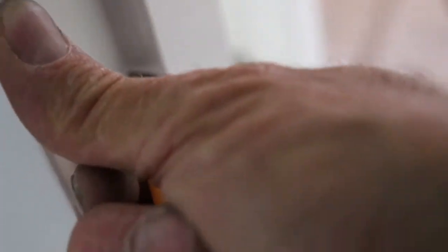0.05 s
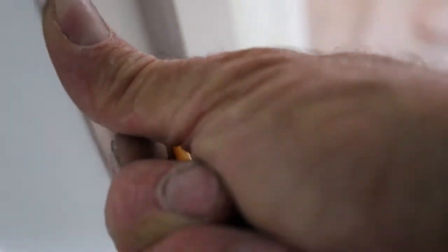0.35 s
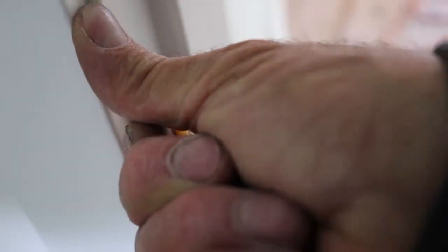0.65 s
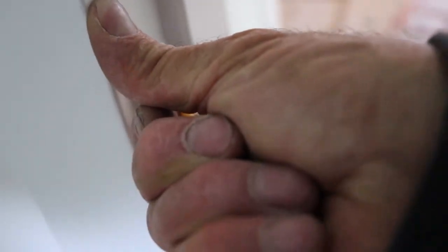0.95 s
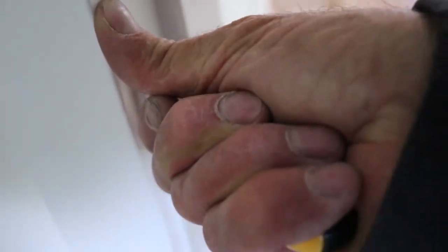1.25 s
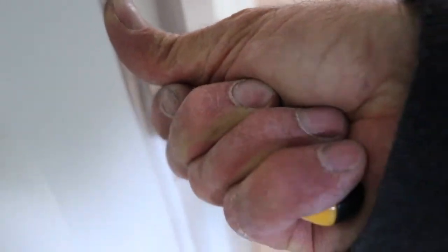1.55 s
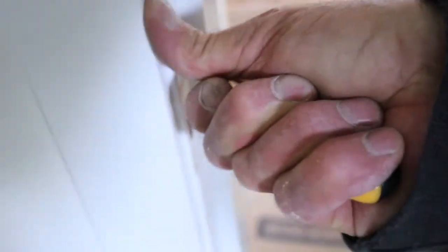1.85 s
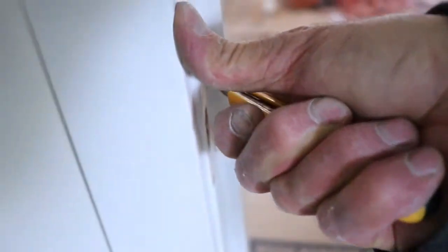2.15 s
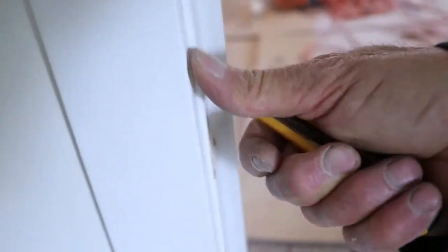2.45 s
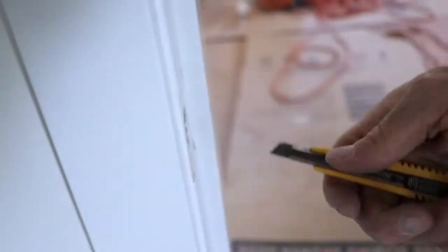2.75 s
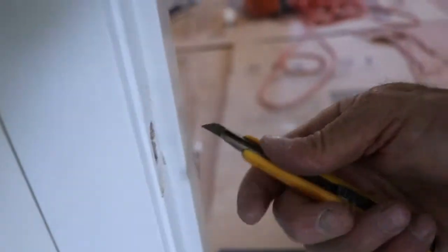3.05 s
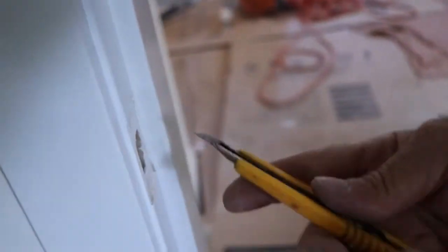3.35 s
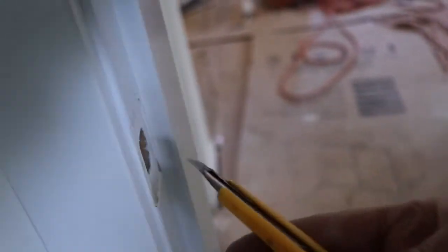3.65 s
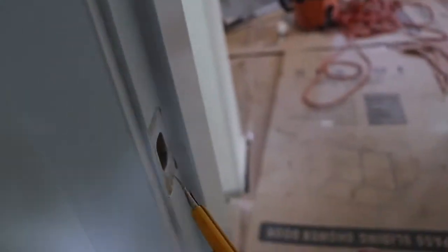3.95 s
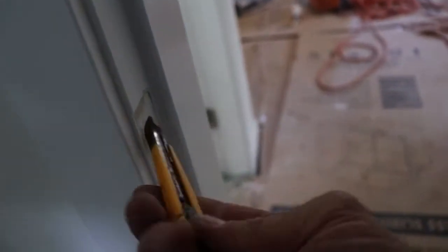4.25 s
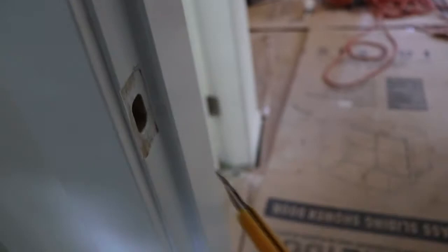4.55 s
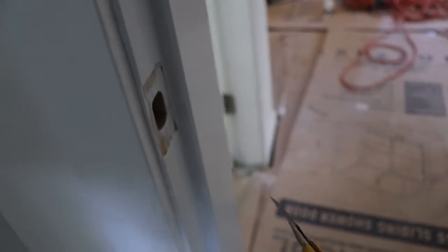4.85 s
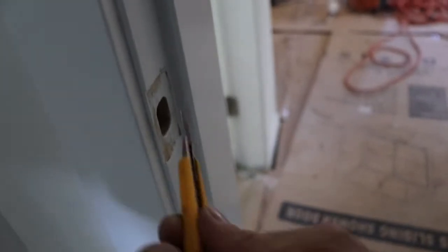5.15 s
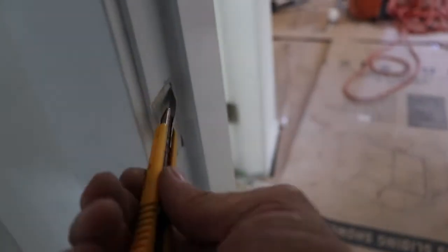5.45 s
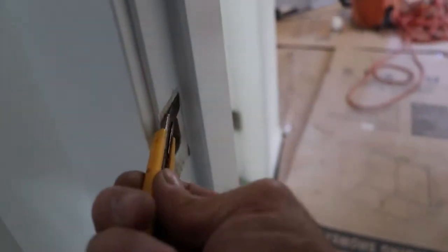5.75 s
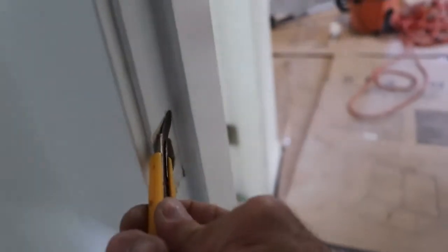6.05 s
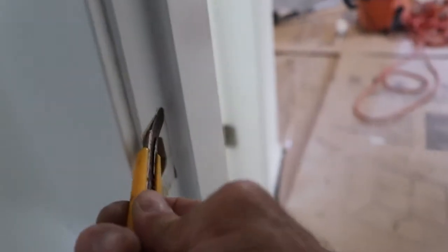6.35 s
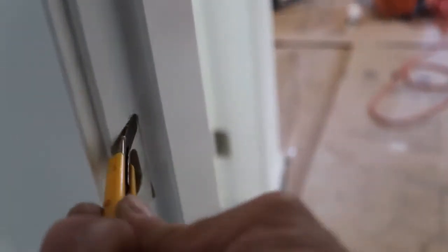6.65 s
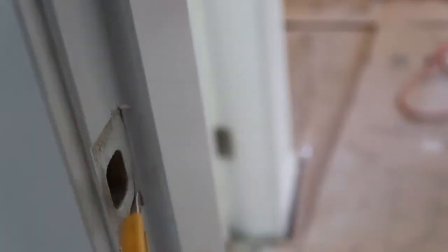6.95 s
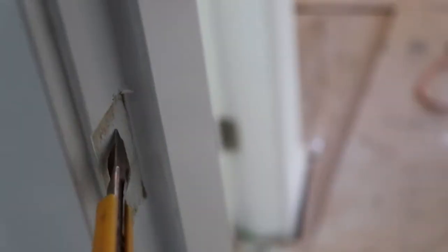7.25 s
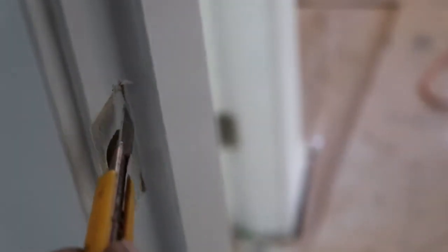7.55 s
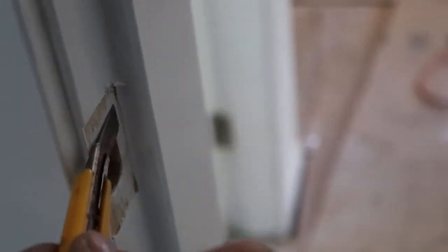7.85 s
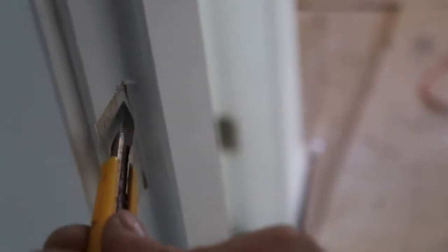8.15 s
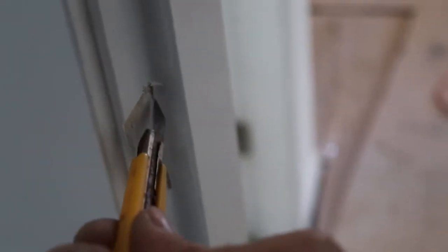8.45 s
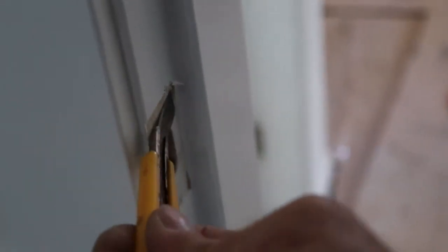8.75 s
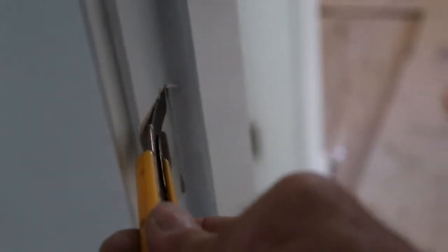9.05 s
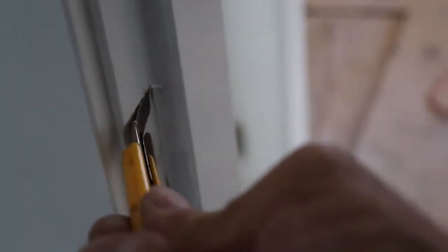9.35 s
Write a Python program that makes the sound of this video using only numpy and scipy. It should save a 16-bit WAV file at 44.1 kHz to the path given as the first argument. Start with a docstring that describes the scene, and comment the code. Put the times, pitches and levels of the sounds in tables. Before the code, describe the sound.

Sharp clicks and snaps come unevenly as a knife blade digs into a painted wooden door frame, close to the microphone. The cracks bunch into a loud flurry early on, then continue as lighter picking and scraping broken by a few hard snaps, dull knocks and one short ring of steel. Soft rubbing of skin and cloth and low microphone handling bumps run underneath, with the short echo and faint hiss of a bare room.

```python
"""A bare room, close to a door frame: a snap-off utility knife chips paint and wood out of a latch recess.
The blade sticks and slips in short cracks, squeaks once and twangs as it springs free. The frame thuds,
hand and sleeve rub along, and a camera body rumbles in the other hand. The room answers over its own
faint hiss. The camera's gain control ducks after the hardest cracks, which clip."""
import sys
import numpy as np
from scipy import signal
from scipy.fft import rfft, irfft, next_fast_len
from scipy.io import wavfile
from scipy.ndimage import uniform_filter1d, map_coordinates

SR = 44100
rng = np.random.default_rng(int(sys.argv[2]) if len(sys.argv) > 2 else 0)


def pcm_store(signal):
    """Save signal as 16-bit PCM."""
    levels = np.round(np.clip(np.atleast_2d(signal), -1, 1) * 32767)
    wavfile.write(sys.argv[1], SR, levels.astype(np.int16).T)


N = 418509


def amp(db):
    """Decibels to gain."""
    return 10 ** (np.asarray(db) / 20)


def unit(x):
    """Scale to rms 1."""
    return x / np.sqrt(np.mean(x ** 2) + 1e-20)


def along(points, hz):
    """Interpolate (freq_hz, value) points on a log axis."""
    freq_hz, values = np.transpose(points)
    return np.interp(np.log(hz + 1), np.log(freq_hz + 1), values)


def wobble(rate_hz):
    """Smooth random curve with knots at rate_hz."""
    knots = rng.standard_normal(int(N * rate_hz / SR) + 4)
    return map_coordinates(knots, [np.arange(N) * rate_hz / SR])


def noise(spectrum, size):
    """Noise of rms 1 with a given spectrum."""
    n_fft = next_fast_len(size)
    hz = np.fft.rfftfreq(n_fft, 1 / SR)
    phases = np.exp(2j * np.pi * rng.random(len(hz)))
    return unit(irfft(amp(along(spectrum, hz)) * phases, n_fft)[:size])


def burst(spectrum, envelope):
    """Shaped noise under an envelope, scaled to the envelope's energy."""
    x = noise(spectrum, len(envelope)) * envelope
    return x * np.linalg.norm(envelope) / (np.linalg.norm(x) + 1e-12)


def swell(length_s, attack_s, release_s, sag_db_per_s=0):
    """Envelope of a movement: sets in, holds or sags, dies away."""
    t = np.arange(SR) / SR
    release = np.exp(-np.maximum(t - length_s, 0) / release_s)
    return (1 - np.exp(-t / attack_s)) * amp(-sag_db_per_s * t) * release


def add(track, start_s, sound):
    """Mix a sound into a track."""
    start = max(round(start_s * SR), 0)
    part = track[start:start + len(sound)]
    part += sound[:len(part)]


def lag(x, time_s):
    """One-pole smoothing."""
    pole = np.exp(-1 / (time_s * SR))
    return signal.lfilter([1 - pole], [1, -pole], x)


def peak(hz, centre_hz, half_width_hz):
    """Resonance curve of height 1."""
    return 1 / (1 + ((hz - centre_hz) / half_width_hz) ** 2)


def causal(gain):
    """Minimum-phase response: rings only after it is struck."""
    cepstrum = irfft(np.log(np.maximum(gain, 1e-6)))
    half = len(cepstrum) // 2
    return np.exp(rfft(cepstrum * np.r_[1, np.full(half - 1, 2), 1, np.zeros(half - 1)]))


# Background air: freq_hz, density_db
AIR_SPECTRUM = [(18, -27), (30, 1), (103, -4), (214, -4), (402, -8.5), (735, -11.5), (981, -14.5),
                (1610, -17), (2100, -17.5), (2270, -19), (3030, -21), (4860, -24), (7390, -25.5),
                (14600, -28.5), (15800, -33)]


def room_tone(level_db=-45):
    """Steady low room tone and hiss."""
    return amp(level_db) * noise(AIR_SPECTRUM, N)


# Reverberation time: freq_hz, t60_s
ROOM_DECAY = [(100, 0.14), (400, 0.67), (2000, 0.5), (6000, 0.54), (10000, 0.39), (16000, 0.48)]
# Colour of the reverberation: freq_hz, gain_db
WALL_COLOUR = [(100, 7), (900, 5.5), (1600, 0), (3000, -4.5), (5500, -0.5), (15000, 1.5)]


def room_response(near_db=-22, near_decay_s=0.019, tail_db=-15, build_s=0.00043):
    """The near door leaf answers at once; the bare room builds up and dies away."""
    hz, frame_s, bands = signal.stft(rng.standard_normal(SR * 3 // 4), SR, nperseg=256)
    band_db = along(WALL_COLOUR, hz)[:, None] - 60 * frame_s / along(ROOM_DECAY, hz)[:, None]
    tail = signal.istft(bands * amp(band_db), SR, nperseg=256)[1]
    t = np.arange(len(tail)) / SR
    tail *= 1 - np.exp(-t / build_s)
    near = rng.standard_normal(len(t)) * np.exp(-t / near_decay_s) * (t > 0.002)
    return amp(tail_db) * tail / np.linalg.norm(tail) + amp(near_db) * near / np.linalg.norm(near)


# Knife's send to the room, low while the fist is cupped over it: time_s, gain_db
KNIFE_SEND = [(0, -3), (.7, -9), (1.3, 2.5), (1.9, 0.5), (2.6, -4), (3.2, 2.5), (5.7, -0.5), (6.9, -1),
              (7.6, -0.5), (9.49, 2)]


def room_echoes(knife, thuds, thud_send_db=8, segments=16):
    """Echoes change as knife and camera move; the broad frame radiates more than the small blade."""
    knife_send_db = np.interp(np.arange(N) / SR, *np.transpose(KNIFE_SEND))
    send = amp(knife_send_db) * knife + amp(thud_send_db) * thuds
    track, step = np.zeros(N), N // segments + 1
    for start in range(0, N, step):
        add(track, start / SR, signal.fftconvolve(send[start:start + step], room_response()))
    return track


# Camera body rumble: freq_hz, density_db
CAMERA_SPECTRUM = [(20, -18), (45, 1), (68, -8.5), (100, 5.5), (125, -0.5), (170, -5), (250, -12.5),
                   (400, -23.5), (900, -34.5), (2500, -60)]
# Grip shifts: start_s, length_s, level_db
GRIP_SHIFTS = [(0, .2, -27.5), (0.236, 0.22, -31.5), (.51, .2, -37.5), (1.218, 0.34, -42.5),
               (1.74, 0.25, -43), (2.28, .25, -43), (3.173, 0.38, -43.5), (3.65, 0.12, -38),
               (3.74, .2, -31), (4.57, 0.055, -30), (4.717, 0.13, -46), (5.268, 0.081, -46),
               (5.71, .11, -40.5), (6.025, 0.11, -36.5), (6.29, 0.4, -36), (6.65, .42, -38.5),
               (7.103, 0.28, -34), (7.758, 0.042, -33)]
# Hand bumps on the camera: start_s, level_db, pitch_hz, decay_s
CAMERA_BUMPS = [(0, -16.5, 88, 0.05), (.06, -18, 102.2, 0.076), (0.414, -20, 100, 0.016),
                (1.645, -25.5, 50.5, 0.023), (3.256, -18, 62.4, 0.049), (3.94, -20, 93.3, 0.049),
                (4.557, -25, 95, 0.042), (4.823, -23.5, 114, 0.016), (5.252, -13.5, 123, 0.0092),
                (6.058, -22, 48, 0.04), (6.06, -12, 91.5, 0.015), (6.274, -15, 91, 0.015),
                (6.325, -16.5, 106, 0.016), (7.446, -19.5, 112, 0.03), (7.745, -19.5, 117, 0.043),
                (7.807, -17, 108, 0.024), (9.042, -31, 74.6, 0.016)]


def camera_handling(rest_db=-54, grip_trim_db=-2, lumpy_db=2, bump_trim_db=-1, bump_attack_s=0.005):
    """The shifting grip rumbles through the camera body; each bump rings its low mode."""
    power = np.full(N, amp(rest_db) ** 2)
    for start_s, length_s, level_db in GRIP_SHIFTS:
        shift = amp(level_db) * swell(length_s, attack_s=0.012, release_s=0.057)
        add(power, start_s, shift ** 2)
    track = np.sqrt(power) * amp(grip_trim_db + lumpy_db * wobble(20)) * noise(CAMERA_SPECTRUM, N)
    t = np.arange(SR // 3) / SR
    for start_s, level_db, pitch_hz, decay_s in CAMERA_BUMPS:
        envelope = np.exp(-t / decay_s) * (1 - np.exp(-t / bump_attack_s))
        add(track, start_s, amp(level_db + bump_trim_db) * envelope * np.sin(2 * np.pi * pitch_hz * t))
    return track


# Skin and cloth sliding: freq_hz, density_db
SLIDE_SPECTRUM = [(200, -5), (500, 5), (1200, -3), (2200, -1), (3200, -2), (5000, 3.5), (6600, -4),
                  (8500, -10.5), (12000, -26.5), (16000, -28)]
# Fizz of catching surfaces and splinters: freq_hz, density_db
FIZZ_SPECTRUM = [(4000, -37), (7000, 6), (8500, 1.5), (11500, -0.5), (15000, -16), (17000, -0.5)]
# Edge dragged along the grain: freq_hz, density_db
RASP_SPECTRUM = [(700, -30), (1400, -14), (1950, 0), (2600, -4), (3100, -8), (4100, 2), (4800, -3.5),
                 (6200, -9), (12000, -32)]
# Strokes of hand, sleeve and blade: start_s, length_s, level_db, fizz_rel_db, rasp_rel_db
STROKES = [(0, 0.5, -56, -14, -10), (1.348, 0.033, -42.5, -13, -14), (1.669, .07, -48.5, -4, -12),
           (2.373, 0.18, -38, -19, -15), (2.685, 0.18, -37, -14, -7), (2.887, 0.22, -40, -18, -18),
           (3.193, 0.067, -33.5, -14, -10), (3.301, .15, -39.5, -8, -7), (3.513, 0.14, -40.5, -9, 2),
           (3.726, 0.14, -39.5, -9, -14), (3.915, 0.14, -41, -25, -12), (4.227, 0.079, -42, -7, 6.5),
           (4.37, 0.3, -48, -12, -4), (4.65, 0.18, -47, -10, 5), (4.923, 0.13, -46, -9, 2.5),
           (5.12, .43, -51.5, -18, -10), (5.615, 0.024, -48, -16, 6), (5.946, 0.032, -44.5, -16, 1),
           (6.567, 0.27, -52.5, -16, 9.5), (6.95, 0.14, -54, -10, 5), (7.317, 0.02, -46, -21, -3),
           (7.806, 0.015, -43, -22, 4.5)]


def rubbing(rest_db=-56.5, grain_db=1.5, grit_db=4):
    """Skin, cloth and steel slide and fizz where they catch; the edge rasps. Each stroke slows."""
    catching = amp(wobble(40))
    slide = unit(noise(SLIDE_SPECTRUM, N) * amp(grain_db * wobble(500)) * catching)
    fizz = unit(noise(FIZZ_SPECTRUM, N) * amp(grain_db * wobble(1200)) * catching ** 2)
    rasp = unit(noise(RASP_SPECTRUM, N) * amp(grit_db * wobble(350)) * catching)
    slide_power, fizz_power, rasp_power = np.full(N, amp(rest_db) ** 2), np.zeros(N), np.zeros(N)
    for start_s, length_s, level_db, fizz_rel_db, rasp_rel_db in STROKES:
        stroke = amp(level_db) * swell(length_s, attack_s=0.0073, release_s=0.048, sag_db_per_s=11.5)
        add(slide_power, start_s, stroke ** 2)
        add(fizz_power, start_s, (amp(fizz_rel_db) * stroke) ** 2)
        add(rasp_power, start_s, (amp(rasp_rel_db) * stroke) ** 2)
    return np.sqrt(slide_power) * slide + np.sqrt(fizz_power) * fizz + np.sqrt(rasp_power) * rasp


# Ticks, flakes and blade cracks: freq_hz, density_db
CRACK_SPECTRUM = [(700, -67), (1200, -11), (2100, 0), (3500, -0.5), (6000, 1), (7300, -6.5), (8500, -10.5),
                  (12000, -33)]


def ticks_and_flakes(tick_count=70, tick_db=-45, flakes_per_stroke=5, flake_rel_db=1, spread_db=3.5):
    """The handle ticks in the fist; paint flakes break off under every stroke."""
    track, t = np.zeros(N), np.arange(SR // 50) / SR
    envelope = np.exp(-t / 0.0007)
    clicks = [(at * N / SR, tick_db) for at in rng.random(tick_count)]
    for start_s, length_s, level_db, _, _ in STROKES:
        for at in rng.random(flakes_per_stroke):
            clicks.append((start_s + at * length_s, level_db + flake_rel_db))
    for start_s, level_db in clicks:
        boost_db = spread_db * min(rng.exponential(), 3)
        add(track, start_s, amp(level_db + boost_db) * burst(CRACK_SPECTRUM, envelope))
    return track


def tip_squeak(start_s=3.945, length_s=0.135, top_hz=8170, arch_hz=950, waver_hz=35,
               level_db=-56, flicker_db=4):
    """The tip skids over paint; pitch and level rise and fall with its speed."""
    progress = np.clip((np.arange(N) / SR - start_s) / length_s, 0, 1)
    speed = 4 * progress * (1 - progress)
    pitch_hz = top_hz - arch_hz * (1 - speed) + waver_hz * wobble(300)
    envelope = speed * amp(level_db + flicker_db * wobble(70))
    return envelope * np.sin(2 * np.pi * np.cumsum(pitch_hz) / SR)


# Door frame response: freq_hz, density_db
FRAME_SPECTRUM = [(30, -25), (90, -2), (160, -2.5), (230, 5), (300, -1), (390, -13), (470, -5.5),
                  (680, -10), (950, -14), (1300, -16), (4000, -51)]
# Blows on the frame: start_s, level_db, decay_s
FRAME_THUDS = [(1.239, -33.5, 0.0093), (1.466, -31.5, 0.015), (1.757, -31, 0.016), (1.915, -23.5, 0.065),
               (2.258, -31.5, 0.016), (2.362, -30.5, 0.011), (3.165, -17, 0.024), (3.252, -32, 0.036),
               (4.559, -41, 0.017), (5.688, -31, 0.019), (5.993, -21.5, 0.0074), (6.138, -26, 0.0051),
               (6.25, -23.5, 0.0035), (9.041, -14, 0.0064)]


def frame_thuds(attack_s=0.0014):
    """The door frame takes the heavier pushes as dull thuds."""
    track, t = np.zeros(N), np.arange(SR // 3) / SR
    for start_s, level_db, decay_s in FRAME_THUDS:
        envelope = np.exp(-t / decay_s) * (1 - np.exp(-t / attack_s))
        add(track, start_s, amp(level_db) * burst(FRAME_SPECTRUM, envelope))
    return track


# Modes of the free blade: pitch_hz, gain_db, t60_s
BLADE_MODES = [(3520, -4, .14), (3875, -4, 0.11), (5400, -3, 0.18), (9400, -8, 0.073), (11680, -6, .09),
               (14100, -15, .08)]
# Blade springing free: start_s, level_db
BLADE_TWANGS = [(7.568, -24), (8.445, -43)]


def blade_twangs():
    """Out of the cut, the undamped steel rings on briefly."""
    track, t = np.zeros(N), np.arange(SR // 3) / SR
    ring = sum(amp(gain_db - 60 * t / t60_s) * np.sin(2 * np.pi * pitch_hz * t)
               for pitch_hz, gain_db, t60_s in BLADE_MODES)
    for start_s, level_db in BLADE_TWANGS:
        add(track, start_s, amp(level_db) * ring)
    return track


# Hollow handle and its steel guide: centre_hz, half_width_hz, gain_db
HANDLE_MODES = [(1607, 170, -3), (2248, 233, -5), (2970, 130, -4), (3383, 400, -2), (3955, 196, -6),
                (4470, 305, -4), (5490, 760, -1.5), (6720, 360, -4.5)]


def handle_response(hz, spread_db=3.5, floor=0.33):
    """The handle's gain curve; the fingers damp its modes differently every time."""
    return floor + sum(amp(gain_db + spread_db * rng.standard_normal()) * peak(hz, centre_hz, width_hz)
                       for centre_hz, width_hz, gain_db in HANDLE_MODES)


def fibre_tear(t, rise_s, decay_s, grit_db=1, snap=0.37, snap_s=0.0006, after_db=-24, after_s=0.013):
    """Force spectrum of one crack: fibres tear ever faster, snap at t = 0, and a few more give way."""
    main_tear = np.exp(np.where(t < 0, t / rise_s, -t / decay_s))
    last_fibres = amp(after_db) * np.exp(-np.abs(t) / after_s) * (t > 0)
    envelope = np.hypot(main_tear, last_fibres)
    slips = amp(grit_db * unit(uniform_filter1d(rng.standard_normal(len(t)), size=40)))
    letting_go = 1 + snap * np.exp(-np.abs(t) / snap_s)
    spectrum = rfft(envelope * slips * letting_go * rng.standard_normal(len(t)))
    band_power = np.abs(uniform_filter1d(np.abs(spectrum) ** 2, size=70) + 1e-12)
    whitened = spectrum * causal(band_power ** -0.5)
    return np.linalg.norm(envelope) * whitened


# Knock of the wood: freq_hz, density_db
WOOD_SPECTRUM = [(60, -6.5), (200, -3.5), (320, -0.5), (430, -3.5), (620, -10), (930, 4), (1130, 0.5),
                 (1330, 3.5), (1560, -7.5), (1850, 3), (2300, -25), (5000, -60)]
# Blade cracks in the wood: snap_s, level_db, rise_s, decay_s, ring_hz, lift_db, wood_db, fizz_db
BLADE_CRACKS = [(0.148, -18.5, .0004, 0.0015, 1500, 3, -16, -17),
                (0.313, -28.5, .0003, 0.00048, 5000, 6, -15, -8),
                (0.3417, -18, .0004, 0.0013, 4300, -6, -25, -18),
                (0.3461, -5.5, 0.00028, 0.00079, 1520, 0, -34, -12),
                (0.3601, -10.5, .006, 0.0053, 4080, -4, -18.5, -14),
                (0.5075, -19.5, 0.0012, 0.0013, 1520, 7, -16, -24),
                (0.5497, -28, .0008, 0.0021, 2220, 16, -18, -27),
                (0.6938, -23.5, .0019, 0.0065, 1590, 3, -9, -12),
                (0.7853, -23, 0.00043, 0.0011, 2150, 20, -27, -18),
                (0.933, -42, 0.0058, .008, 1910, 9, 1, -14),
                (1.1999, -18, .0009, 0.001, 1620, 21, -4.5, -29),
                (1.2389, -11, 0.001, 0.00086, 1670, 10.5, -6, -20),
                (1.2926, -28, 0.001, .0009, 1690, 3, -10, -13),
                (1.372, -25.5, 0.0005, 0.0028, 1620, -3, -18, -7.5),
                (1.466, -29, 0.0022, 0.0054, 6150, 9, -1, -11),
                (1.765, -31.5, 0.021, 0.0046, 1680, 7, -9, -5),
                (1.925, -16, 0.0049, 0.0065, 1520, 13, -6, -12),
                (1.9324, -3, 0.0007, 0.00068, 3060, 5, -20, -6.5),
                (1.9419, -12.5, 0.0033, .007, 1610, 7, -4, -19),
                (2.1147, -14.5, 0.00035, 0.0021, 3280, 9, -15, -23),
                (2.2629, -7, .0013, 0.00094, 2200, 14, -10.5, -16.5),
                (2.3619, -17, 0.00018, 0.0013, 6040, -2, -9.5, -0.5),
                (2.4098, -12.5, 0.00019, 0.0014, 1570, 9, -12, -17),
                (2.44, 5.5, 0.00047, 0.00095, 2400, 10.5, -11.5, -17.5),
                (2.459, -17, .0008, .0015, 1730, 24, -10, -15),
                (2.4801, -15.5, .0017, 0.0032, 1480, 3, -10, -18),
                (2.5295, -19, .0005, .0007, 2200, 8, -7, -16),
                (2.549, -3.5, 0.0011, 0.00038, 2340, 16, -16, -22),
                (2.5679, -10.5, 0.0023, .0009, 2300, 10, -7, -11),
                (2.5765, 15.5, .0007, 0.0023, 2300, 0.5, -22, -11),
                (2.5961, 0.5, .004, 0.0044, 2300, -2, -35, -6.5),
                (2.6158, -6, 0.0013, 0.0021, 4370, 9, -39, -19),
                (2.7438, -17.5, .0008, .0009, 1600, 12, -13, -20),
                (2.9605, -24.5, 0.0059, 0.0027, 1800, -6, -11, -19),
                (2.98, -27, 0.0066, 0.0055, 1670, -2, -24, -15),
                (3.027, -31, .0003, .006, 3050, -4, -16, -12),
                (3.117, -6, 0.00024, 0.0018, 4260, 7.5, -42, -11),
                (3.155, -19.5, 0.0014, 0.0056, 4030, -8, -12, -17),
                (3.1778, -6.5, .0003, 0.0028, 4440, 3, -30, -16),
                (3.1934, -10, 0.00029, 0.005, 6400, -1, -27, -9),
                (3.234, -26, .0009, 0.0073, 1530, 14, -17, -19),
                (3.257, -21, 0.0097, 0.004, 1590, 6, -17, -18),
                (3.3815, -6, 0.00043, .001, 4840, 4.5, -33, -15),
                (3.582, -24.5, 0.00067, 0.025, 2130, -12, -12, -17),
                (3.7668, -19.5, 0.00035, 0.0034, 3500, -1, -27, -17),
                (4.237, -20.5, 0.00035, 0.0016, 3870, 10, -28, -17),
                (4.2464, -15.5, 0.00023, 0.00055, 4000, 9, -31, -20),
                (4.3493, -12.5, 0.0006, 0.0065, 3900, -2, -15.5, -8),
                (4.4336, -21, .0004, 0.0032, 2740, 9, -23, -14),
                (4.4512, -16.5, 0.00023, 0.0024, 7100, 6, -24, -12),
                (4.6258, -5.5, 0.0046, 0.0078, 7130, 7, -24, -9),
                (4.64, -6.5, 0.00055, .002, 3730, 2, -44, -5),
                (4.6628, -14, .0002, 0.00081, 4890, 3, -29, -5),
                (4.7041, -10, 0.0059, 0.0025, 6800, 6, -40, -11.5),
                (4.7154, -13, 0.001, 0.0022, 6100, -4, -38, -7),
                (4.956, -19.5, 0.0016, 0.0032, 3550, 9, -27, -18),
                (5.0772, -19, 0.00091, 0.0018, 2120, 1, -23, -11),
                (5.0848, -17, 0.00051, 0.0075, 2980, 6, -23, -17),
                (5.5325, -28, 0.0084, 0.00068, 4130, 6, -12, -11),
                (5.676, -13.5, 0.00032, 0.0019, 2250, 14, -14, -30),
                (5.6879, 0.5, 0.00027, 0.00096, 2250, -1.5, -24, -19),
                (5.9945, -11, 0.0035, 0.0021, 2200, 7, -9.5, -14.5),
                (6.3698, -34, .0003, .0025, 1950, 26, -4, -17),
                (6.438, -31, .0003, .0018, 1830, 5, -14, -2.5),
                (6.7188, -25.5, .0004, 0.0026, 4250, 13, -19, -2),
                (6.8391, -24, 0.0012, 0.002, 1980, 7, -18, -16),
                (6.875, -13.5, .0002, 0.0017, 4370, -7, -13, -13),
                (6.892, 2.5, 0.0017, 0.0035, 3870, -1, -22, -10.5),
                (7.002, -20.5, .0002, 0.0028, 3180, 7, -27, -19),
                (7.0535, -25, .0002, 0.0051, 3050, 3, -12, -16),
                (7.121, -26.5, 0.00088, 0.0021, 4450, 10, -15, -8),
                (7.162, -36, 0.00055, .0086, 1880, 15, -8, -20),
                (7.3265, -23, 0.00049, 0.0083, 4100, 2, -17, -15),
                (7.35, -16, 0.00028, 0.00052, 6000, 6, -11, -5),
                (7.3771, -14, 0.00024, 0.0017, 6470, 1, -21, -16),
                (7.475, -22.5, 0.00026, 0.0036, 3580, -8, -10, -10.5),
                (7.4877, -25.5, 0.0045, .0019, 2960, 10, -9, -28),
                (7.566, -8, 0.00084, 0.0025, 3250, 2, -19.5, -19),
                (7.572, -14, .0025, 0.0073, 6640, -3, -28, -11.5),
                (7.743, -12, 0.00065, 0.0012, 1540, 0, -12, -10),
                (7.8433, -19, 0.00036, .001, 2090, 7, -9, -28),
                (7.8528, -25.5, 0.00057, 0.0027, 2010, 8, -6, -29),
                (8.1713, -27, .0008, .0016, 2110, 4, -9, -20),
                (8.187, -22, 0.0012, 0.0013, 2020, 9, -16, -27),
                (8.2195, -25.5, .0009, 0.0023, 2880, 15, -9, -25),
                (8.274, -18.5, .0006, 0.0023, 1930, 3, -11, -9),
                (8.4248, -18, 0.00034, 0.0015, 2860, 13, -14, -28),
                (8.443, -17, 0.003, 0.0083, 1870, 3, -25, -8.5),
                (8.5566, -18, 0.00039, 0.003, 2920, 2, -19, -10.5),
                (8.6402, -31.5, .001, .0012, 2120, 12, -4, -17),
                (8.746, -31.5, .0002, .0009, 5120, 6, -16, -3),
                (8.876, -35.5, 0.00065, 0.0024, 2050, 17, -11, -14),
                (8.9768, -29, .0007, .0013, 1940, 5, -7, -22),
                (9.0417, 6.5, 0.00057, 0.0019, 2220, 12.5, -3.5, -11),
                (9.47, -1.5, 0.00012, 0.0015, 4370, 11, -17.5, -13)]


def blade_cracks(half_width_hz=290, overtone_ratio=1.66, overtone_db=-13, wood_trim_db=-2,
                 handle_db=-4.5, dull_above_hz=4200, dulling_per_octave=0.34, around_exponent=0.79):
    """Each tear rings the blade, knocks the wood and fizzes. Returns direct and less ringing room feed."""
    direct, around = np.zeros(N), np.zeros(N)
    t = (np.arange(4096) - 1500) / SR
    hz = np.fft.rfftfreq(len(t), 1 / SR)
    steel, wood, fizz = (unit(amp(along(points, hz)))
                         for points in (CRACK_SPECTRUM, WOOD_SPECTRUM, FIZZ_SPECTRUM))
    dulling = dulling_per_octave * np.log2(np.maximum(hz / dull_above_hz, 1))
    for snap_s, level_db, rise_s, decay_s, ring_hz, lift_db, wood_db, fizz_db in BLADE_CRACKS:
        force = amp(level_db) * fibre_tear(t, rise_s, decay_s)
        # ring_hz shifts with how deep the blade is wedged
        overtone = amp(overtone_db) * peak(hz, overtone_ratio * ring_hz, half_width_hz)
        ring = amp(lift_db) * (peak(hz, ring_hz, half_width_hz) + overtone)
        # more ring, less treble into the handle
        handle = amp(handle_db - dulling * lift_db) * handle_response(hz)
        timber = np.hypot(amp(wood_db + wood_trim_db) * wood, amp(fizz_db) * fizz)
        for track, exponent in ((direct, 1), (around, around_exponent)):
            colour = np.hypot(unit(steel * (ring + handle) ** exponent), timber)
            add(track, snap_s + t[0], irfft(force * causal(colour)))
    return direct, around


def scene():
    """Knife and frame in the room, over handling noise and room tone."""
    cracks, cracks_around = blade_cracks()
    thuds = frame_thuds()
    background = room_tone() + room_echoes(cracks_around, thuds)
    knife = cracks + blade_twangs() + tip_squeak() + ticks_and_flakes()
    return (background + knife + thuds + rubbing() + camera_handling())[None]


def gain_control(x, threshold_db=-20, slope=0.58, release_db_per_s=72, window_s=0.015, attack_s=0.0044):
    """Short-term power over the threshold pulls the gain down; it recovers at a steady rate."""
    level_db = 10 * np.log10(lag(x ** 2, window_s) + 1e-12)
    cut_db = slope * np.maximum(level_db - threshold_db, 0)
    recovery_db = release_db_per_s * np.arange(N) / SR
    held_db = np.maximum.accumulate(cut_db + recovery_db) - recovery_db
    return x * amp(-lag(held_db, attack_s))


def record(dry, ceiling=0.94, top_hz=15900):
    """Gain control, clipping of what slips past it, band limit."""
    clipped = np.clip(gain_control(dry[0]), -ceiling, ceiling)
    n_fft = next_fast_len(N + SR // 2)
    passband = np.fft.rfftfreq(n_fft, 1 / SR) < top_hz
    return irfft(rfft(clipped, n_fft) * passband, n_fft)[None, :N]


dry = scene()
out = record(dry)
pcm_store(out)
```